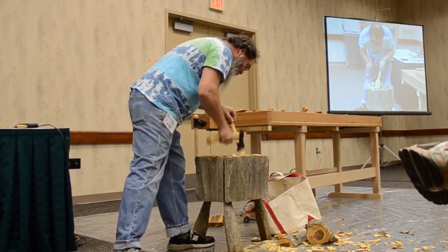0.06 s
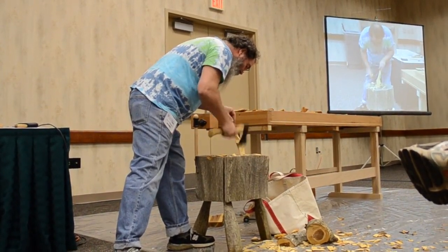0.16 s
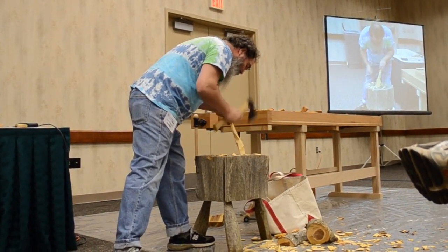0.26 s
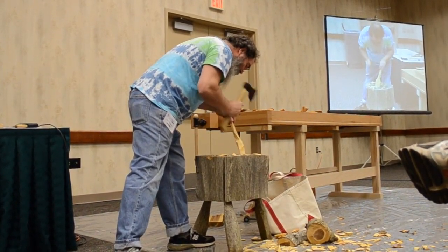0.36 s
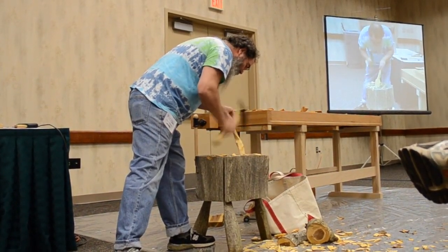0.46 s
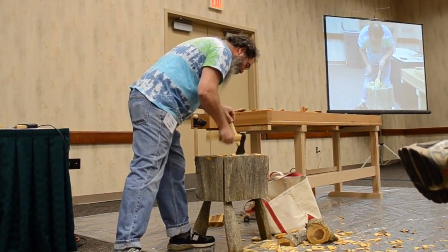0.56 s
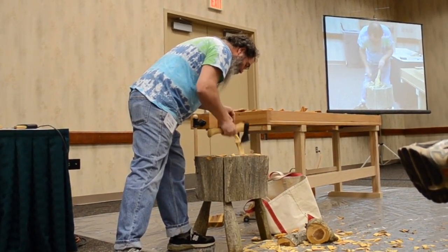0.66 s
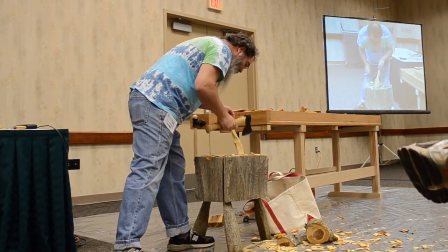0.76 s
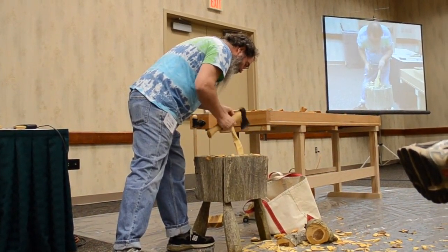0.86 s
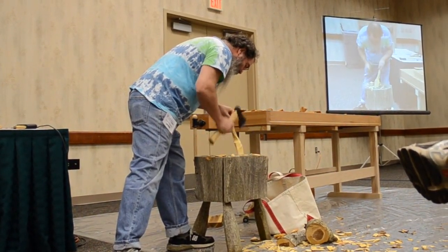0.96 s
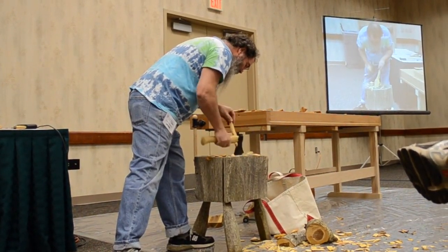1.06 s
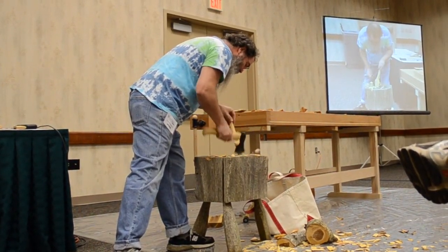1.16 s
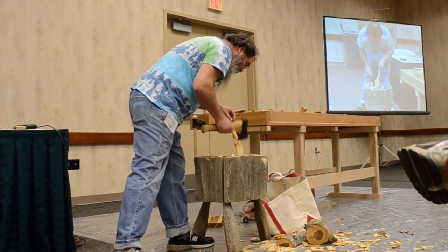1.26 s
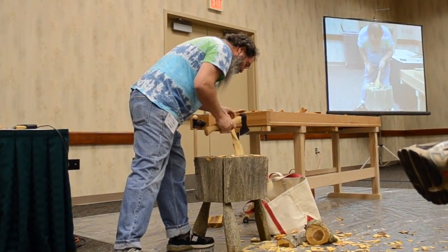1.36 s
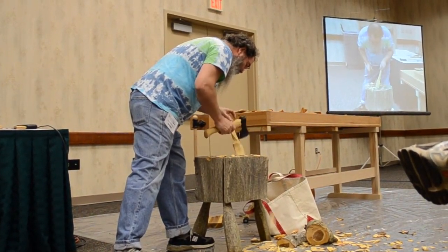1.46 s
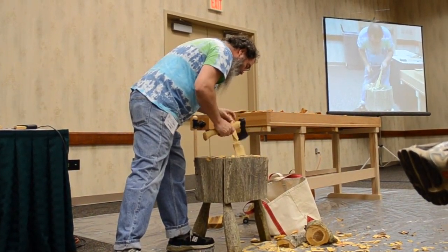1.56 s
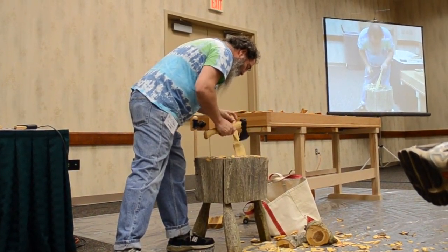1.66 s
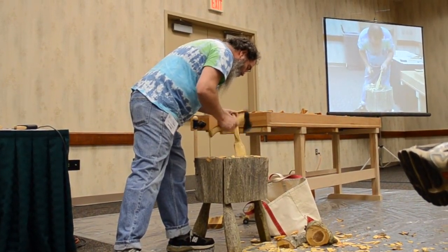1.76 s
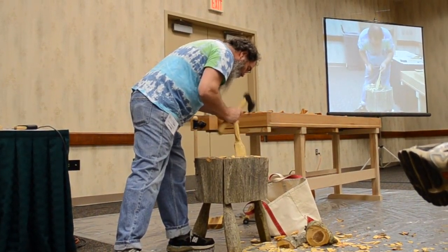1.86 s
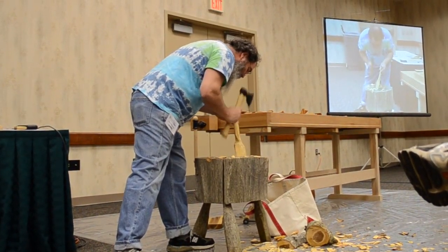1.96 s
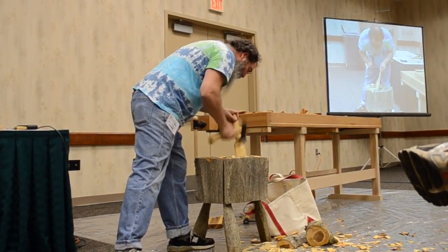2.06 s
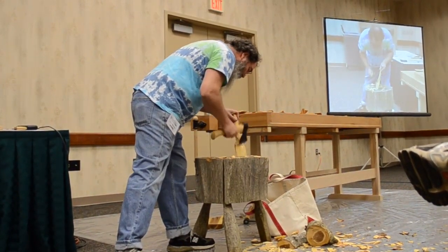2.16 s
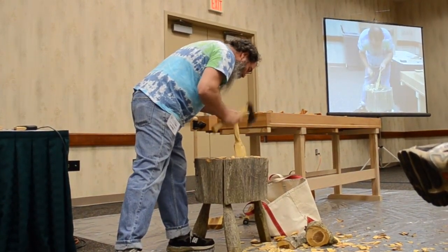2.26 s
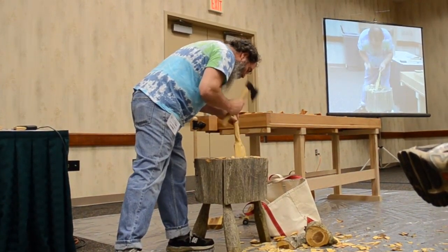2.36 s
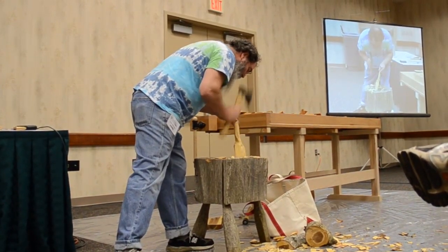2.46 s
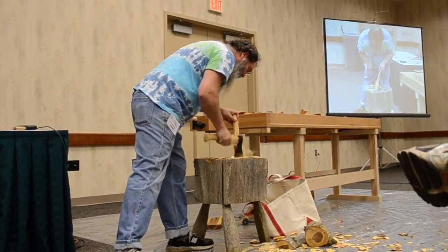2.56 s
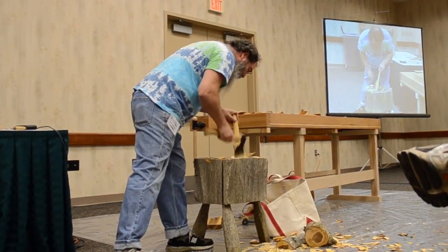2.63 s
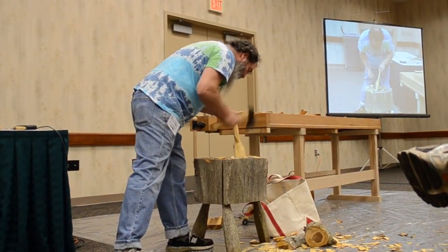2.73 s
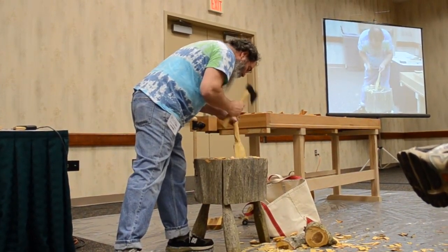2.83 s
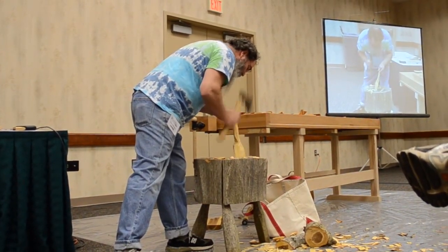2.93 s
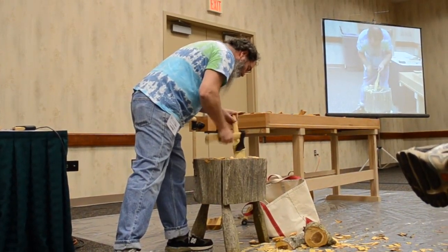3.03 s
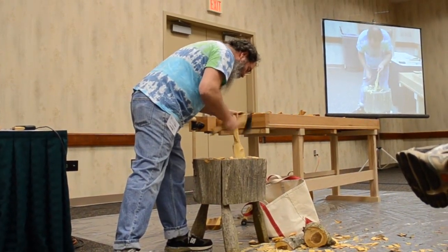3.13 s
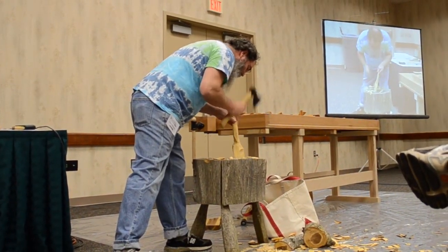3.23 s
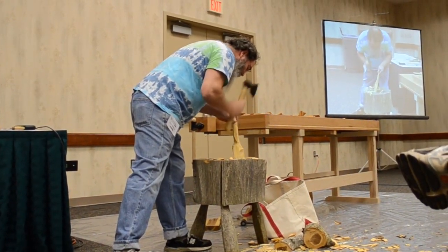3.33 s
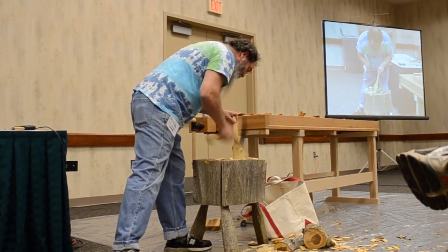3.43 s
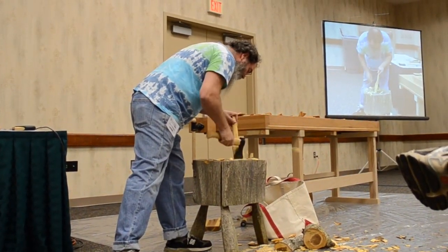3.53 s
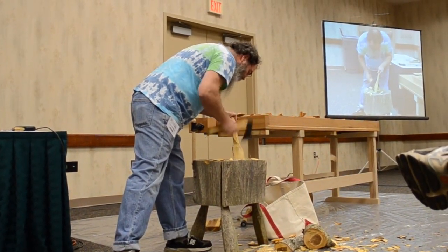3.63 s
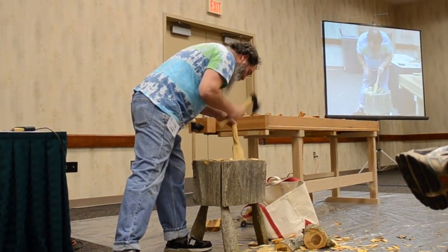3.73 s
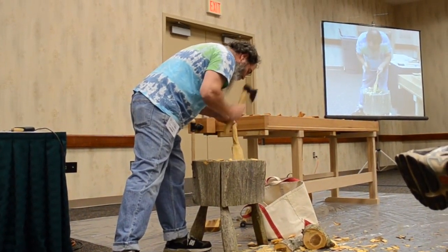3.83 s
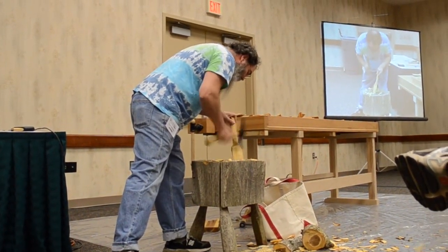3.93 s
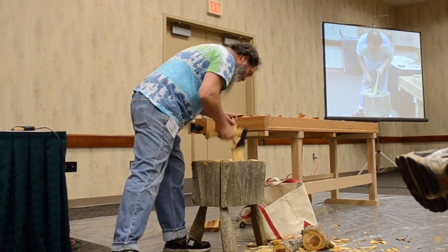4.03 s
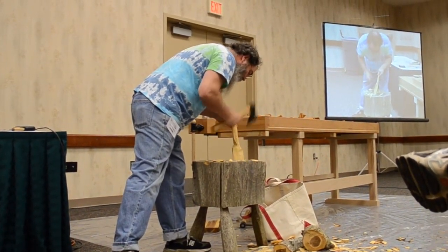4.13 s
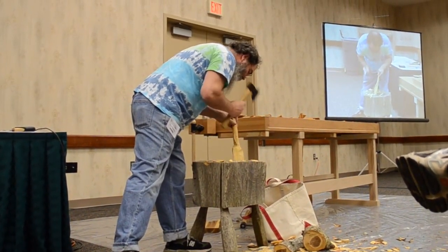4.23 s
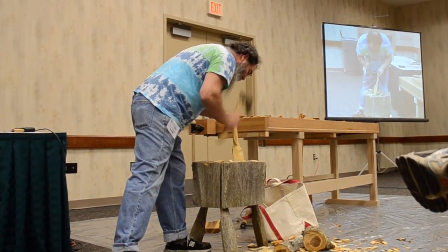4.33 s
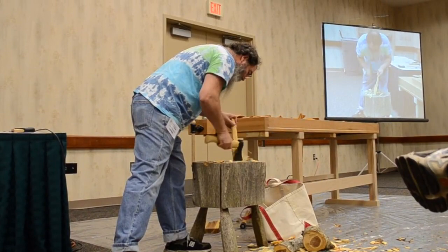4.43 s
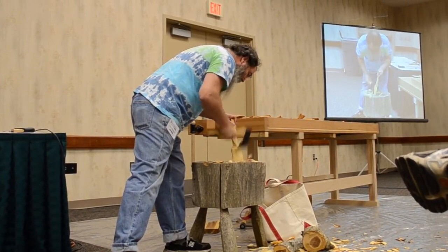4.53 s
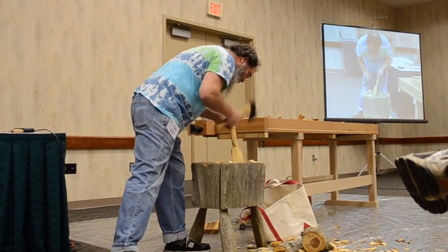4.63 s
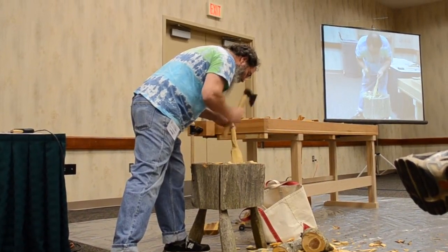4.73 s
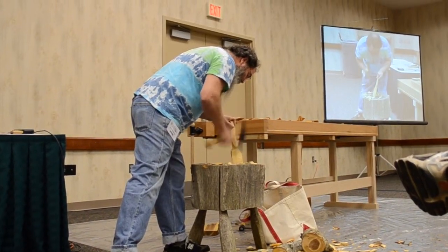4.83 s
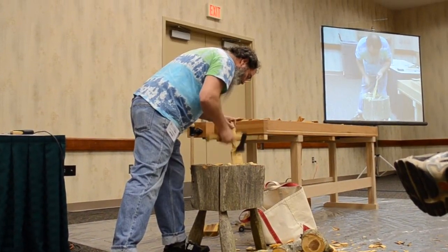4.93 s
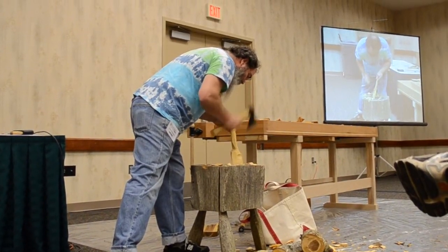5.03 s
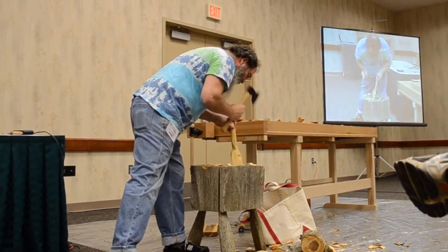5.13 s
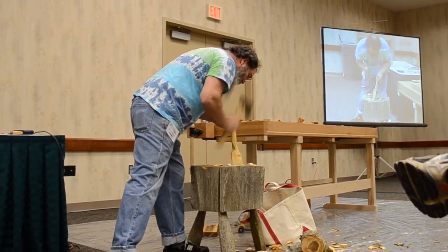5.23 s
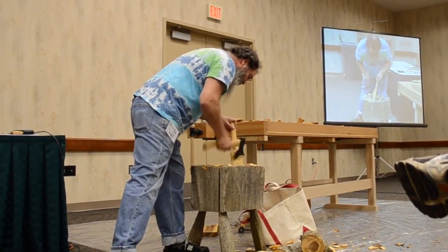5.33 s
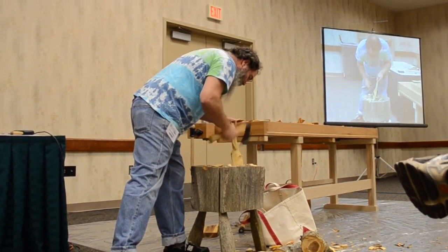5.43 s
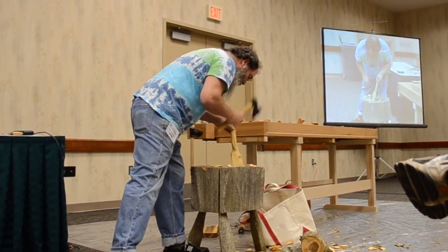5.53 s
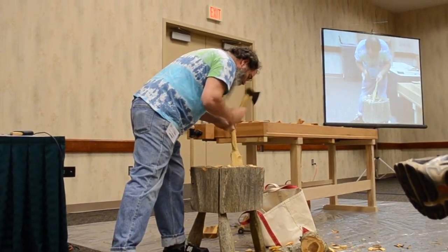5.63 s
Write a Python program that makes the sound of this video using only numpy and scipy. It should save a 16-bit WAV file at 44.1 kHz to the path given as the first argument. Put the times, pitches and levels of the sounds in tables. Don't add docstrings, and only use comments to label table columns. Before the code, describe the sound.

A hatchet chops a wooden blank on a stump about twice a second, loud hollow knocks echoing in a large hall over steady ventilation.

```python
import sys
import numpy as np
from scipy import signal
from scipy.fft import rfft, irfft, next_fast_len
from scipy.io import wavfile

SR = 44100
rng = np.random.default_rng(int(sys.argv[2]) if len(sys.argv) > 2 else 0)


def volts(x):
    e = np.asarray(x, float) / 20
    return 10 ** e


def bounce(signal):
    frames = np.transpose(np.atleast_2d(signal))
    limited = np.clip(frames, -1, 1)
    pcm = np.round(limited * 32767).astype(np.int16)
    wavfile.write(sys.argv[1], SR, pcm)


N = 250929
SIZE = next_fast_len(N + 2 * SR)
EDGES_HZ = 20 * 2 ** np.arange(0, 9.8, .5)

# (frequency [Hz], density [dB per Hz])
VENTILATION = [(20, -1), (40, -4.5), (75, -8.5), (150, -5), (300, -0.5), (500, 0), (950, 0.5), (1500, -6.5),
               (2300, -13.5), (3200, -18), (5000, -27.5), (8000, -35), (12000, -32), (16000, -42)]
# (frequency [Hz], density [dB per Hz])
CAPSULE_NOISE = [(18, -40), (30, -15), (111, -12), (144, -13.5), (332, -5.5), (1050, -3), (3320, -14),
                 (7080, -27), (15500, -26)]
# (time [s], peak [dB], knock pitch [Hz], upper wood modes against the peak [dB])
TOUCHES = [
    (.0280, -22, 905, -8.5),
    (.0320, -13.5, 980, -10.5),
    (0.048, -26, 1200, -4),
    (0.06, -25, 1060, -12),
    (0.5755, -23, 1300, 8),
    (1.632, -34.5, 725, 3.5),
    (1.64, -28.5, 1210, -3),
    (2.3605, -48, 786, -1),
    (3.979, -29.5, 900, -3.5),
    (4.473, -12.5, 910, -2),
]
# (time [s], wood modes under 1.7 kHz [dB],
# modes near 3 kHz [dB], stump thud [dB], floor shake [dB])
SPOTS = [(.028, 4.5, 8, -5.5, -63), (.129, 1, -1, -31, -57), (0.5765, 2.1, 4, -14, -46),
         (1.111, -3.5, 4.5, -8.5, -23), (1.6318, -2.5, 3.5, -19.5, -70), (2.1418, -3, -5.5, -29, -25.5),
         (2.611, 2, -14, -19.5, -33), (3.073, 1.3, -1, -43, -47), (3.523, 0.6, 1, -24, -40),
         (4.015, 3, -0.5, -25.5, -15), (4.465, 3, 2.5, -11, -27), (4.9225, 3.7, -2, -14, -14.5),
         (5.374, 1.8, 2.5, -16.5, -18.5)]
# (time [s], peak [dB], knock pitch [Hz],
# upper wood modes against the peak [dB], splinter crack against the peak [dB])
CUTS = [(.1290, 1, 870, -3.5, -52), (.5790, -4, 840, -4, -15), (0.5833, -0.5, 936, -5.5, -32),
        (1.114, -3.5, 953, 1.5, -34), (2.1431, 3, 850, -15, -36), (2.6134, 4, 904, -8, -35),
        (2.6160, 7, 970, -14, -40), (3.0706, 5, 907, -2.5, -21), (3.5195, 7, 899, -5.5, -32),
        (4.0170, 5.5, 864, -6, -28), (4.4674, 6, 937, -23, -57), (4.918, -30, 1160, -24, -5),
        (4.9226, 5.5, 865, -8.5, -18.5), (5.37, 6, 938, -5, -24.5), (5.376, 5, 1267, -11.5, -23.5)]
# (time [s], peak [dB], knock pitch [Hz], stump thud against the peak [dB])
LANDINGS = [
    (0.5879, 4, 793, -1.5),
    (1.1280, -1, 808, 2),
    (2.6473, -4.5, 803, 0),
    (3.5348, 1.5, 700, 1.5),
    (3.5373, 1, 740, -1.5),
    (3.5417, -2.5, 1090, 1),
    (4.4963, -5.5, 745, 6),
    (4.5002, -2.5, 806, -4),
]
# (frequency [Hz], level [dB], t60 [s])
UPPER_WOOD = [(1056, 0.5, 0.0093), (1300, 5, 0.0061), (1479.6, 1, 0.013), (1705, 0.5, 0.0071),
              (1804, -0.5, 0.014), (2060, -3.5, 0.0088), (2650, -12, 0.012), (3480, 1, 0.0016)]
# (frequency [Hz], level [dB], t60 [s])
STUMP = [(133.4, -14, 0.022), (256, -23, 0.047), (367, -10, 0.033), (464, -24, 0.034), (608, -16, 0.038)]
# (delay [s], level [dB])
ECHOES = [(.0036, -17), (.0068, -16), (.0095, -30.5), (.0150, -19.5), (.0190, -25.5), (.0214, -12),
          (.0226, -24), (.0245, -14), (.0335, -37), (.0515, -56), (.0560, -31.5), (.0655, -38),
          (.0990, -28), (.1085, -25.5), (.1325, -34), (.2500, -66), (.2900, -50), (.3400, -56)]
# (frequency [Hz], early level [dB], early t60 [s], late level [dB], late t60 [s])
TAIL = [(99.5, -49.5, 1, -71, 1.3), (253, -41.5, 0.86, -61, 0.59), (700, -42.5, 0.39, -56.5, 1.06),
        (1460, -47, 0.44, -57, 1.2), (3460, -46, 0.34, -61, 1.27), (6840, -46, 0.32, -55, 0.76),
        (13700, -72, 0.11, -64, .4)]
# (time [s], lowest mode [dB], bending [dB], twisting [dB], freedom to ring on [0-1])
HEAD_BLOWS = [
    (0.131, -16.5, -47, -33.5, 0.),
    (0.577, -24.5, -45, -37, 0.),
    (1.1132, -29.5, -27.5, -29, 0.69),
    (2.6146, -16.5, -41, -37, 0.25),
    (3.07, -18, -32, -23, 0.36),
    (3.52, -20, -33, -50, 0.2),
    (4.017, -22, -45, -43, 0.52),
    (4.4728, -30.5, -40, -36, 0.2),
    (4.9219, -14, -34, -23.5, 0.16),
    (5.3708, -20, -23.5, -44, 0.37),
]
# (frequency [Hz], t60 [s], spread of three partials [share of frequency])
HEAD_MODES = [(2987, 0.0088, 0.061), (4393, 0.01, 0.053), (5750, 0.0048, 0.051), (7675, 0.026, 0.019),
              (8520, 0.016, 0.013)]


def at_hz(rows, hz, column=1):
    rows = np.array(rows)
    return np.interp(np.log(hz), np.log(rows[:, 0]), rows[:, column])


def noise_bands(count):
    white = rng.standard_normal((2, count + SR))
    for k, (low, high) in enumerate(zip(EDGES_HZ, EDGES_HZ[1:])):
        bandpass = signal.butter(2, [low, high], "band", fs=SR, output="sos")
        band = signal.sosfilt(bandpass, white[k % 2])
        yield np.sqrt(low * high), band[SR:]


def steady(spectrum, waver_db):
    out, knots = 0, np.arange(0, N + SR, SR // 12)
    for hz, band in noise_bands(count=N):
        drift = np.interp(np.arange(N), knots, rng.standard_normal(len(knots)))
        waver = waver_db / (1 + hz / 1500) * drift
        out = out + band * volts(at_hz(spectrum, hz) + waver)
    out = signal.sosfilt(signal.ellip(10, 1, 50, 15800, fs=SR, output="sos"), out)
    return out / out.std()


def mode(t, hz, t60, rise_s):
    swell = (1 - np.exp(-t / rise_s)) ** 2
    return swell * volts(-60 * t / t60) * np.sin(2 * np.pi * hz * t)


def add(out, s, sound):
    i = round(s * SR)
    out[i:i + len(sound)] += sound[:len(out) - i]


def ventilation():
    return volts(-45.5) * steady(VENTILATION, waver_db=3.0)


def capsule_noise():
    return volts(-59) * steady(CAPSULE_NOISE, waver_db=2.0)


def contacts():
    rows = [(s, db, hz, None, upper_db, crack_db) for s, db, hz, upper_db, crack_db in CUTS]
    rows += [(*row, -15, -33.5) for row in LANDINGS]
    rows += [(s, db, hz, None, upper_db, upper_db - 12.5) for s, db, hz, upper_db in TOUCHES]
    return sorted(rows, key=lambda row: row[0])


def knock(t, hz):
    return mode(t, hz, 11.13 / hz, 0.00087) + volts(-16) * mode(t, 0.863 * hz, 24.0 / hz, 0.00051)


def upper_wood(t, upper_db, low_db, high_db):
    out, colour_db = 0, [low_db, low_db, 0, high_db]
    for k, (hz, db, t60) in enumerate(UPPER_WOOD):
        louder, detune = rng.standard_normal(2)
        strength_db = upper_db + db + colour_db[k // 2] + 2 * louder
        out = out + (-1) ** k * volts(strength_db) * mode(t, hz * (1 + detune / 40), t60, 0.00025)
    return out


def stump(t, thud_db):
    out = 0
    for k, (hz, db, t60) in enumerate(STUMP):
        strength_db = thud_db + db + 2 * rng.standard_normal()
        out = out + (-1) ** k * volts(strength_db) * mode(t, hz, t60, 0.0036)
    return out


def splinter(t, crack_db):
    bright = signal.butter(2, [2200, 6300], "band", fs=SR, output="sos")
    burst = rng.standard_normal(len(t)) * volts(-60 * t / 0.011)
    return volts(crack_db) * signal.sosfilt(bright, burst)


def wood():
    out, t = np.zeros(N), np.arange(SR // 8) / SR
    for s, db, hz, thud_db, upper_db, crack_db in contacts():
        _, low_db, high_db, spot_thud_db, _ = min(SPOTS, key=lambda row: abs(row[0] - s))
        thud_db = spot_thud_db if thud_db is None else thud_db
        sound = knock(t, hz) + upper_wood(t, upper_db, low_db, high_db)
        sound += stump(t, thud_db) + splinter(t, crack_db)
        add(out, s, volts(db + 4.0) * sound)
    return out


def floor_shake():
    out, t = np.zeros(N), np.arange(SR // 8) / SR
    for s, *_, shake_db in SPOTS:
        add(out, s, volts(shake_db + 11) * mode(t, 70, 0.017, 0.0024))
    return out


def wall_echoes():
    echoes = np.zeros(SR + SR // 2)
    for k, (s, db) in enumerate(ECHOES):
        echoes[round(s * SR)] = volts(db) * (-1) ** k
    return signal.sosfilt(signal.butter(1, 6000, fs=SR, output="sos"), echoes)


def diffuse_tail():
    t, tail = np.arange(SR + SR // 2) / SR, 0
    for hz, band in noise_bands(count=len(t)):
        early = volts(at_hz(TAIL, hz, column=1) - 60 * t / at_hz(TAIL, hz, column=2))
        late = volts(at_hz(TAIL, hz, column=3) - 60 * t / at_hz(TAIL, hz, column=4))
        tail = tail + band * np.hypot(early, late)
    build_up = 1 - np.exp(-(t / 0.0098) ** 2)
    return volts(7.5) * tail * build_up


def hall(x):
    response = wall_echoes() + diffuse_tail()
    return x + irfft(rfft(x, SIZE) * rfft(response, SIZE), SIZE)[:N]


def steel_head():
    out, t = np.zeros(N), np.arange(SR // 8) / SR
    overtone_share, free_overtone_db = 0.54, 15
    for s, low_db, bend_db, twist_db, free in HEAD_BLOWS:
        free = np.clip(free, 0, 1)
        longer, narrower = 1 + 0.56 * free, 1 - 0.21 * free
        bend_overtone_db = -44.5 + overtone_share * bend_db + free_overtone_db * free
        twist_overtone_db = -34 + overtone_share * (twist_db - free_overtone_db * free)
        levels_db = [low_db, bend_db, twist_db, bend_overtone_db, twist_overtone_db]
        for db, (hz, t60, spread) in zip(levels_db, HEAD_MODES):
            offset = rng.uniform(-1.24, 1, 3)
            partials_hz = hz * (1 + spread * narrower * (np.arange(-1, 2) + offset / 3))
            for k, partial_hz in enumerate(partials_hz):
                ring = mode(t, partial_hz, t60 * longer, 0.00038)
                add(out, s, (-1) ** k * volts(db + 15.0) * ring)
    return out


def scene():
    mid = ventilation() + hall(wood() + steel_head()) + floor_shake()
    side = capsule_noise()
    return np.array([mid + side, mid - side])


def band_limit(x):
    return signal.sosfilt(signal.butter(12, 16580, fs=SR, output="sos"), x)


def record(dry):
    overloaded = np.clip(dry, -.99, .99)
    return band_limit(overloaded)


dry = scene()
out = record(dry)
bounce(out)
```